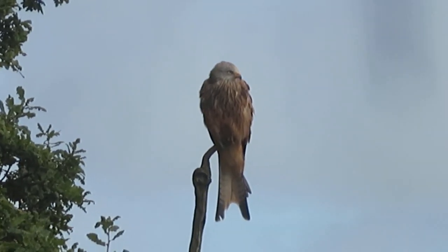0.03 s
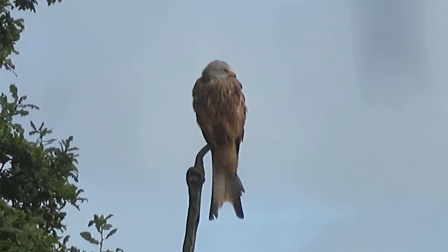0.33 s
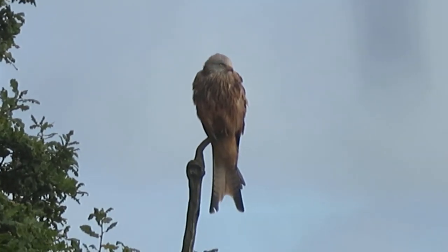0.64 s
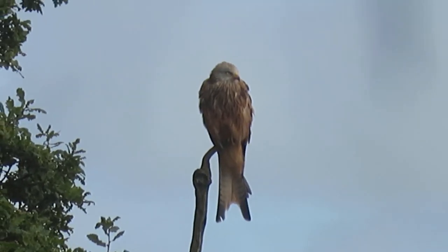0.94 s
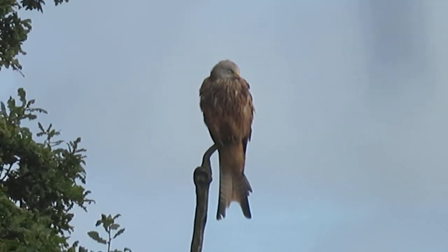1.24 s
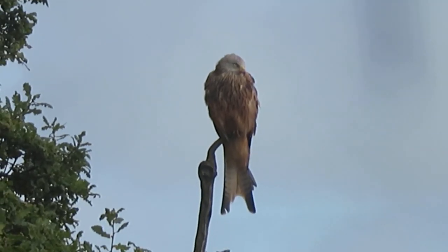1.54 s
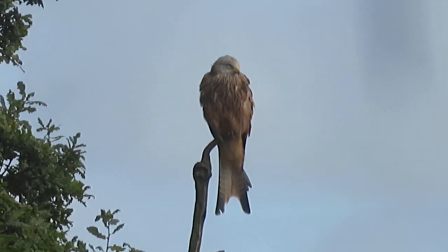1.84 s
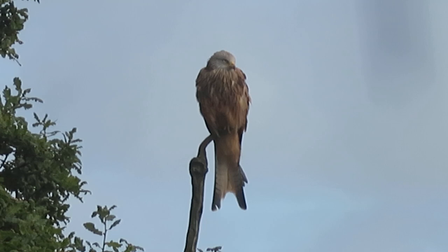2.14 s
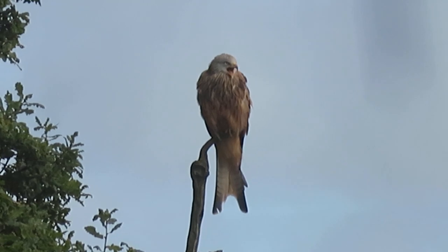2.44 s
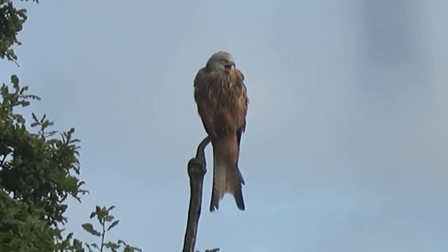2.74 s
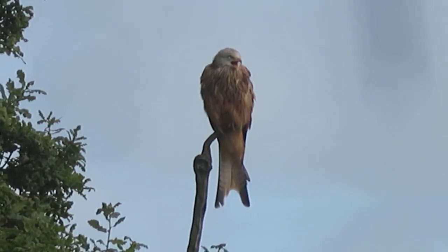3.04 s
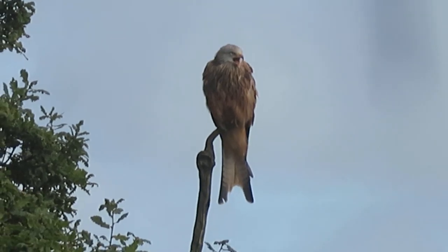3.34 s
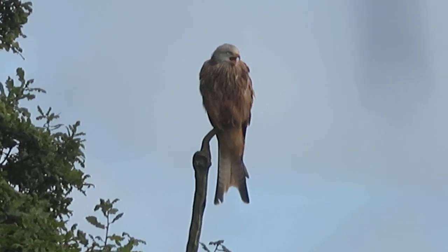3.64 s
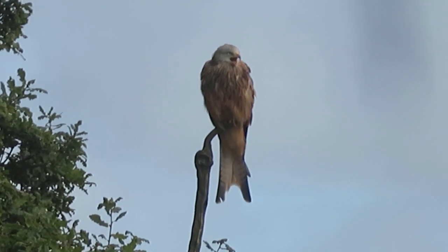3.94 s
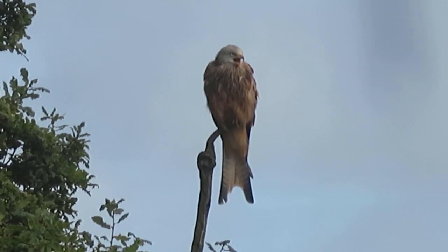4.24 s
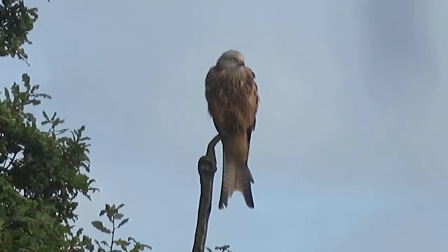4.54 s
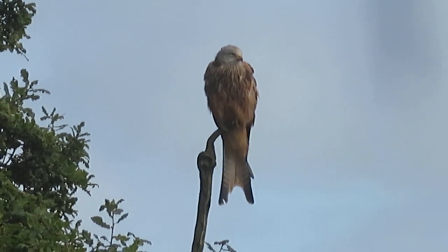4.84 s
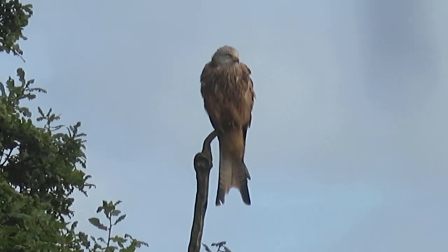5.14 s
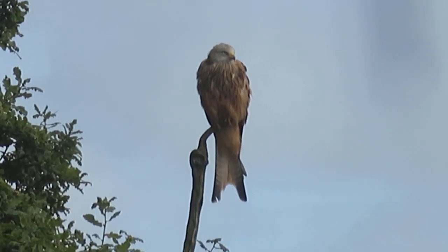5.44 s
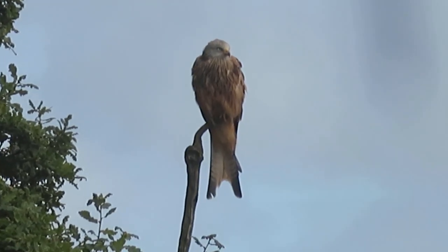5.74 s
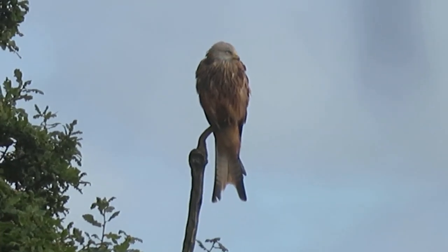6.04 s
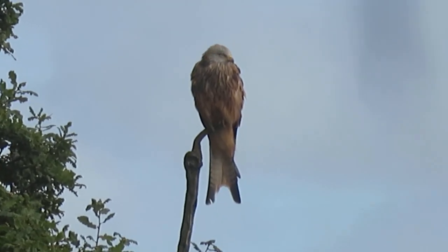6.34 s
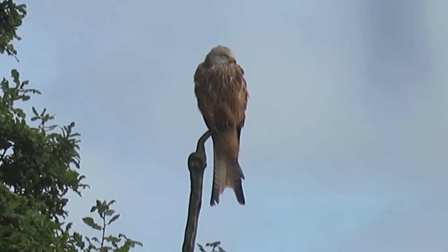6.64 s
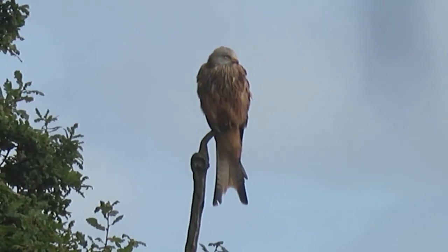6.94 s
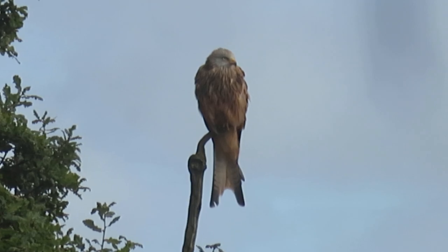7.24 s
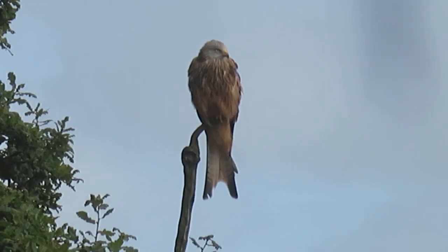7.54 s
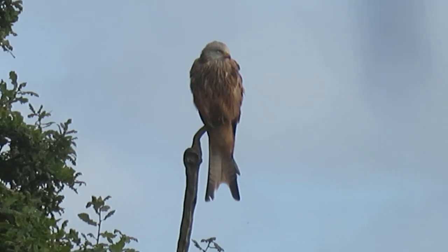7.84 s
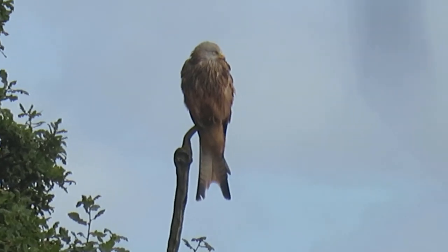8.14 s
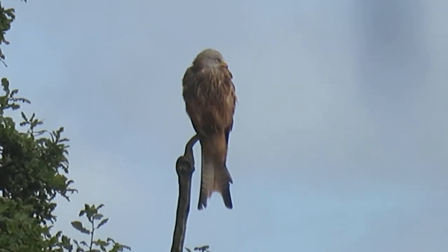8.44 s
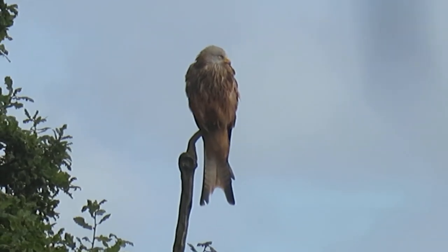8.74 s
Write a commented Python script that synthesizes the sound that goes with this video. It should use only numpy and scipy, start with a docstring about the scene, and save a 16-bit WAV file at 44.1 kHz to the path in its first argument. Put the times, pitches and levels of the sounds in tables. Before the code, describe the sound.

Low wind buffets hit the microphone over a soft outdoor hiss. In a lull, a bird of prey some way off whistles a high, drawn-out note that slides down and turns into a slightly hoarse quaver, with a light echo from the trees. A second bird replies with one very faint falling whistle. Stronger gusts follow, thumping and rumbling much louder than the birds.

```python
"""Gusts of wind thump and rumble as their eddies hit the microphone. Between them a red kite on a
bare branch gives one long falling whistle that breaks into a quaver: one side of its syrinx sings
the note, the other joins hoarsely on the crests. Another kite answers faintly from far away, and both
echo off the trees before the wind comes back harder. Behind it all lies a soft outdoor hiss, with a
few brief swishes and one small tick."""
import sys
import numpy as np
from scipy import signal
from scipy.fft import rfft, irfft, next_fast_len
from scipy.io import wavfile
from scipy.ndimage import uniform_filter1d, map_coordinates

SR = 44100
rng = np.random.default_rng(int(sys.argv[2]) if len(sys.argv) > 2 else 0)


def to_wav(sig):
    """Store sig (one row per channel, or 1-D mono) as 16-bit WAV at the path in sys.argv[1].

    Samples outside -1..1 are clipped; the rate is SR.
    """
    pcm = np.clip(np.atleast_2d(sig), -1, 1) * 32767
    pcm = np.round(pcm).astype(np.int16)
    wavfile.write(sys.argv[1], SR, pcm.T)  # frames by channels


N = 396018
TIME = np.arange(N) / SR

# The kite's long opening note. Each row: time in seconds, pitch in Hz, level in dB.
OPENING_NOTE = [(2.69, 2360, -66), (2.722, 2490, -56), (2.755, 2556, -50), (2.81, 2553, -51.5),
                (2.87, 2524, -57.5), (2.925, 2485, -64), (2.978, 2400, -52.5), (3.04, 2380, -58.5),
                (3.085, 2380, -60), (3.165, 2360, -52.5), (3.21, 2345, -53), (3.27, 2324, -61),
                (3.38, 2327, -60), (3.52, 2275, -64), (3.58, 2185, -58), (3.635, 2070, -50)]
# The flutter as that note runs out: middle and half length in seconds, beats per second, depth in dB.
CLOSING_FLUTTER = (3.422, .17, 22, 5.5)
# The quaver's pitch arches. Each row: start and rise time in seconds, crest in Hz, level rising and
# falling in dB, middle and half length of the voice break in seconds, its dip in dB, level of the
# syrinx's second side in dB, its hold past the crest in seconds.
QUAVER_ARCHES = [(3.639, 0.099, 2585, -51, -46.5, 3.732, 0.054, -15, -57.5, 0.095),
                 (3.935, 0.11, 2580, -44.5, -44.5, 4.052, 0.02, -3.5, -55.5, 0.051),
                 (4.22, 0.11, 2606, -44, -47.5, 4.325, 0.021, -5.5, -61, 0.094),
                 (4.491, .108, 2617, -48, -47.5, 4.603, 0.031, -13, -59, 0.14),
                 (4.744, 0.059, 2434, -46, -42.5, 4.855, 0.02, -8, -86, .02)]
# The voice brightens as its octave flares. Each row: middle and half length in seconds, level in dB.
OCTAVE_FLARES = [(2.83, .1, -70), (3.1, .12, -70), (3.31, 0.085, -63), (3.681, .025, -67),
                 (3.89, 0.035, -62.5), (3.97, 0.033, -64), (4.34, 0.058, -69), (4.601, 0.04, -66.5)]
# The distant answer. Each row: time in seconds, pitch in Hz, level in dB.
FAR_CALL = [(5.93, 2790, -71), (6.02, 2730, -70.5), (6.11, 2530, -68.5), (6.19, 2490, -67),
            (6.28, 2400, -68), (6.37, 2360, -68.5), (6.45, 2320, -79)]
# Gusts. Each row: peak time and length in seconds, strength of large and of small eddies in dB.
GUST_SWELLS = [(0.683, 0.032, -35, -27), (0.724, 0.05, -27.5, -32), (0.818, 0.098, -27, -26),
               (0.977, 0.08, -21.5, -27.5), (1.51, 0.095, -32.5, -59), (1.842, 0.11, -29, -39.5),
               (1.962, 0.055, -29.5, -38), (2.056, 0.061, -34, -35.5), (2.454, 0.11, -36.5, -38),
               (2.654, 0.13, -42, -48.5), (3.192, 0.086, -35.5, -42.5), (3.737, 0.094, -42, -64),
               (3.868, 0.024, -32, -53), (4.494, 0.099, -29, -36.5), (4.85, 0.15, -37, -51.5),
               (5.315, 0.051, -41, -45), (5.456, 0.16, -38.5, -45.5), (5.873, 0.099, -42, -54),
               (7.091, 0.019, -27, -33), (7.207, 0.063, -17, -26.5), (7.403, 0.026, -22, -30),
               (7.445, 0.04, -26, -22.5), (7.64, 0.017, -21, -28), (7.751, 0.084, -17, -23),
               (7.882, 0.053, -36, -23.5), (7.956, 0.021, -38, -25.5), (8.022, 0.056, -32, -25.5),
               (8.124, 0.064, -31, -25), (8.201, 0.02, -40, -23), (8.422, 0.17, -26, -22.5),
               (8.602, 0.018, -37, -25), (8.735, 0.11, -37, -28.5), (8.92, 0.041, -49, -28.5)]
# The breeze under them. Each row: time in seconds, strength of large and of small eddies in dB.
BREEZE_BED = [(0.0, -49.5, -55.5), (0.29, -50.5, -60), (0.57, -33, -46.5), (0.66, -29.5, -37),
              (0.9, -29, -40.5), (1.11, -26.5, -28), (1.3, -32, -42), (1.65, -41.5, -53.5),
              (2.05, -36.5, -47.5), (2.73, -50, -54), (3.24, -40, -54), (3.55, -45.5, -57),
              (4.49, -42, -56), (4.97, -40.5, -56), (5.13, -45, -60), (5.67, -43.5, -58.5),
              (6.26, -52.5, -59), (6.47, -43, -58), (6.87, -36.5, -56.5), (7.21, -21, -31.5),
              (7.36, -26, -32), (7.52, -31, -47), (7.6, -34, -29), (7.82, -30.5, -27), (8.07, -35.5, -33.5),
              (8.3, -38, -28), (8.6, -33.5, -29.5), (8.75, -33, -28.5), (8.81, -42, -38.5),
              (8.98, -44, -36.5)]
# The tone of the two sizes of eddy. Each row: frequency in Hz, relative level in dB.
RUMBLE_SPECTRUM = [(20, -25.5), (32, 5), (60, 9.5), (100, 12), (150, 4.5), (200, -9.5), (280, -27.5),
                   (450, -67), (2000, -110)]
KNOCK_SPECTRUM = [(80, -28), (150, 0.5), (210, 2.5), (280, -2), (360, -9), (468, -13.5), (530, -27),
                  (700, -34.5), (1200, -50.5), (4000, -100)]
# How the wind meets the microphone. Each row: time in seconds, sub-bass gain in dB, side gain in dB.
WIND_DEPTH_AND_WIDTH = [(0, 4, -32), (.6, -3.5, -3.5), (1.2, -12, -4.5), (2.3, 0.5, -6), (4.4, -3, -10),
                        (6.4, 7.5, -5.5), (7.25, -1, 5.5), (7.5, -4, -6), (7.78, -14, -5), (8.0, -14, -14),
                        (8.98, -25, -19.5)]
# The hardest buffets. Each row: time in seconds, relative peak in dB, centre in Hz, left over right in dB.
HARD_BUFFETS = [(0.402, -29.5, 147, -3), (0.598, -19, 130, -1), (0.63, -20, 116, 1), (0.665, -9.5, 215, -7),
                (0.729, -20, 177, -3), (0.783, -11, 201, 6), (0.803, -12.5, 163, 0), (0.955, -8, 140, -3),
                (0.976, -11.5, 203, -6), (1.137, -15.5, 174, -2), (1.195, -17, 175, -4),
                (1.241, -18, 152, -2), (1.787, -23, 147, -4), (1.892, -21, 148, -3),
                (1.958, -19.5, 150, -5), (2.052, -16, 166, -1), (2.132, -23, 163, -4),
                (2.306, -26.5, 200, -6), (2.443, -25, 262, -11), (2.507, -20, 141, -2),
                (2.622, -23.5, 120, -2), (3.017, -25.5, 122, -1), (3.173, -27, 118, 1),
                (3.71, -21.5, 106, -2), (3.77, -24, 126, -2), (3.856, -23.5, 122, -2.5),
                (4.062, -26, 127, -1), (4.47, -20.5, 180, -7), (4.507, -15, 195, -7),
                (4.541, -21, 130, -3.5), (4.869, -25, 147.4, -3), (4.902, -24, 123, -1.5),
                (5.322, -26, 130, 2), (5.464, -26, 140, -3), (5.837, -29, 130, 2), (5.866, -26.5, 137, 3),
                (6.011, -27.5, 108, -2), (6.605, -26.5, 92, -2), (6.694, -23, 151, -7),
                (7.094, -16.5, 111, 3), (7.195, -13, 163, 10), (7.206, -8.5, 125, -3),
                (7.229, -12, 120, -3), (7.405, -14, 183, 3), (7.449, -12.5, 236, 10), (7.612, -19, 262, 7),
                (7.633, -6.5, 175, -3), (7.687, -16, 272, -6), (7.749, -6.5, 173, -3),
                (7.769, -11, 210, -5), (7.802, -21, 310, -15), (7.871, -8.5, 186, -2),
                (8.012, -18, 214, -2), (8.033, -14, 228, 0), (8.108, -10, 207, -1.5),
                (8.132, -11.5, 245, -1.5), (8.195, -13.5, 258, -3.5), (8.259, -12, 166, -1),
                (8.29, -12, 196, -0.5), (8.339, -11, 232, -3), (8.388, -3.5, 207, -1.5),
                (8.419, -9.5, 244, -3), (8.443, -8, 220, -3), (8.551, -14.5, 206, -1),
                (8.636, -12.5, 264, -3), (8.723, -16, 243, 1), (8.85, -23.5, 206, 0),
                (8.916, -19.5, 190, -1)]
# The tone of the outdoor hiss. Each row: frequency in Hz, relative level in dB.
HISS_SPECTRUM = [(100, -1.5), (300, 15), (500, 10), (800, 8.5), (1200, 5.5), (2400, 2), (4500, -2.5),
                 (7000, -8), (11000, -13), (12500, -15.5), (14500, -20), (15600, -30)]
# The stereo image of hiss and swishes. Each row: frequency in Hz, left-right correlation.
STEREO_LIKENESS = [(60, 0.9), (200, 0.86), (600, 0.41), (1200, 0.33), (2500, 0.56), (5000, 0.53),
                   (8000, 0.28), (13000, -0.17)]
# The fader ride on the hiss. Each row: time in seconds, level in dB.
HISS_LEVEL = [(0, -51), (.7, -50.5), (1.2, -51.5), (5, -51.5), (8.98, -52)]
# Swishes. Each row: middle and half length in seconds, level in dB, centre in Hz, half width in octaves.
SOFT_SWISHES = [(0.364, 0.009, -51, 2300, .4), (0.406, 0.067, -52.5, 3200, 0.86),
                (4.195, 0.11, -56.5, 3310, 1.0), (5.935, 0.054, -59.5, 900, 0.079),
                (6.19, 0.12, -59.5, 780, 0.19)]
# One dry tick. Its row: time in seconds, peak in dB, centre in Hz, left over right in dB.
DRY_TICK = [(2.131, -39.5, 1020, 0)]

QUAVER_END_S, TROUGH_HZ = 4.85, 2094   # every arch starts and ends on the same low pitch
CUTOFF_HZ = 15600


def kite(second_ratio=1.246, second_lag_s=0.005, rasp_db=-25, crack_db=-64, flicker_db=0.95):
    """One side of the syrinx whistles; the other joins hoarsely a third higher on the quaver's crests."""
    pitch, main_db, second_db, cracked = kite_phrase()
    pitch = uniform_filter1d(uniform_filter1d(pitch, size=1200), size=1200)   # muscles round every turn
    pitch = pitch * (1 + 0.0019 * drift(70))
    falter = 1 + np.clip((-48.5 - main_db) / 4, 0, 1.2)   # a weakly blown note nearly breaks off
    main_gain = from_db(main_db + flicker_db * falter * drift(80))
    main = main_gain * whistle(pitch, jitter=0.0018, jitter_rate=450)
    flare = sum(from_db(db) * np.exp(-((TIME - s) / half) ** 2) for s, half, db in OCTAVE_FLARES)
    octave = flare * from_db(2 * drift(60)) * whistle(2 * pitch, jitter=0.00304, jitter_rate=430)
    patches = from_db(3.8 * np.minimum(drift(110), 1.3) - 2)
    hoarse = patches * whistle(second_ratio * pitch, jitter=0.015, jitter_rate=900)
    second = from_db(np.interp(TIME - second_lag_s, TIME, second_db)) * hoarse
    # rushing air spreads a faint skirt of noise round the note, stronger where the voice cracks
    rasp_gain = from_db(main_db + rasp_db) + from_db(crack_db) * cracked
    rasp = rasp_gain * drift(800) * whistle(pitch, jitter=0.0297, jitter_rate=2200)
    return (main + octave + second + rasp) * gate(OPENING_NOTE[0][0], QUAVER_END_S, fade_s=0.0052)


def kite_phrase(rise_curve=1.5, fall_curve=1.62, sag_db=-3.5, trough_db=-22, fade_db_per_s=400):
    """Pitch, levels of the syrinx's two sides and its cracking: one long note, then a run of arches."""
    pitch, main_db = automation(OPENING_NOTE)
    middle, half, beat_hz, depth_db = CLOSING_FLUTTER
    flutter_db = depth_db * np.exp(-((TIME - middle) / half) ** 2)
    main_db += flutter_db * np.cos(2 * np.pi * beat_hz * (TIME - middle))
    second_db, cracked = np.full(N, -120.), np.zeros(N)
    ends = [arch[0] for arch in QUAVER_ARCHES[1:]] + [QUAVER_END_S]
    for arch, end in zip(QUAVER_ARCHES, ends):
        start, rise, crest_hz, rise_db, fall_db, break_at, break_half, break_db, side_db, hold = arch
        now = (TIME >= start) & (TIME < end + .1)
        past_crest = TIME[now] - start - rise
        rising = past_crest < 0
        # the pitch lingers in the trough, climbs, then falls ever more steeply
        climb = np.abs(np.cos(np.pi / 2 * past_crest / rise)) ** rise_curve
        fallen = np.clip(past_crest / (end - start - rise), 0, 1)
        height = np.where(rising, climb, 1 - fallen ** fall_curve)
        pitch[now] = TROUGH_HZ + (crest_hz - TROUGH_HZ) * height
        voice_break = np.exp(-((TIME[now] - break_at) / break_half) ** 6)
        dip_db = break_db * voice_break + sag_db * np.sin(np.pi * fallen ** 2)
        main_db[now] = np.where(rising, rise_db, fall_db) + dip_db
        grating = 1.3 * rising * np.sin(np.pi * height) ** 2   # the voice grates halfway up each climb
        cracked[now] = np.maximum(voice_break, grating)
        release_db = fade_db_per_s * np.maximum(past_crest - hold, 0)
        second_db[now] = side_db + trough_db * (1 - height) ** 2 - release_db
    return pitch, *uniform_filter1d([main_db, second_db, cracked], size=400)


def far_kite(flicker_db=2.0):
    """A faint falling whistle, made unsteady by the air on its long way."""
    pitch, level_db = automation(FAR_CALL)
    tone = whistle(pitch, jitter=0.008, jitter_rate=280)
    gain = from_db(level_db + flicker_db * drift(35))
    return gain * tone * gate(FAR_CALL[0][0], FAR_CALL[-1][0], fade_s=0.055)


def whistle(pitch_hz, jitter, jitter_rate):
    """A near sine of rms 1 whose pitch trembles."""
    trembling_hz = pitch_hz * (1 + jitter * drift(jitter_rate))
    return np.sqrt(2) * np.sin(2 * np.pi * np.cumsum(trembling_hz) / SR)


def tree_echoes(x, t60, count=40):
    """Sparse echoes scattered back from the foliage, different on each side."""
    out = np.zeros((2, N))
    for channel in out:
        for delay_s, size in zip(rng.uniform(0.032, 0.29, count), rng.standard_normal(count)):
            lag = int(delay_s * SR)
            channel[lag:] += size * from_db(-60 * delay_s / t60) * x[:N - lag]
    return out / np.sqrt(count)


def wind(knock_trim_db=0.1, edge_db=-8, ports_hz=205):
    """Large eddies rumble on the microphone; small ones knock, more sharply the harder it blows."""
    large_db, small_db = wind_strength()
    depth_db, width_db = automation(WIND_DEPTH_AND_WIDTH)
    kicks = eddies(per_s=700, spread_db=3.5)
    rumble = from_db(large_db) * buffet(kicks, RUMBLE_SPECTRUM)
    sub_bass = signal.sosfiltfilt(signal.butter(2, 75, fs=SR, output="sos"), rumble)
    rumble += sub_bass * (from_db(depth_db) - 1)
    knocks = from_db(small_db + knock_trim_db) * buffet(kicks, KNOCK_SPECTRUM)
    dull = signal.sosfiltfilt(signal.butter(3, 330, fs=SR, output="sos"), knocks)
    # slow air sheds fewer of the finest eddies
    lull = np.clip((-29.5 - uniform_filter1d(small_db, size=20000)) / 20, 0, .7)
    knocks = dull + (knocks - dull) * from_db(edge_db * lull)
    mid, side = rumble + knocks
    # long pressure waves press on both ports alike, so the side loses its bass
    low_cut = signal.butter(2, ports_hz, "high", fs=SR, output="sos")
    side = from_db(width_db) * signal.sosfilt(low_cut, side)
    return (mid + side * [[1], [-1]]) * from_db([[-.3], [.3]])


def wind_strength(turbulence_db=1.7, steepness=3.9):
    """Levels in dB of the large and the small eddies: steep-sided gusts on top of an uneven breeze."""
    power = from_db(np.array(automation(BREEZE_BED)) + turbulence_db * drift(20)) ** 2
    for s, length, large_db, small_db in GUST_SWELLS:
        near = np.abs(TIME - s) < 2 * length
        swell = np.exp(-np.abs(2 * (TIME[near] - s) / length) ** steepness)
        power[:, near] += from_db([[large_db], [small_db]]) ** 2 * swell
    return 10 * np.log10(power)


def eddies(per_s, spread_db):
    """Pressure kicks at random moments, a few much stronger than the rest."""
    sizes = from_db(spread_db * np.minimum(rng.exponential(1, N), 5)) * rng.choice([-1, 1], N)
    return sizes * (rng.random(N) < per_s / SR)


def buffet(kicks, spectrum):
    """Kicks rounded into thumps of steady mean power, as mid and side of the two microphone ports."""
    mid_side = np.array([kicks, kicks * rng.standard_normal(N)])
    size = next_fast_len(N + 4096)
    hz = np.fft.rfftfreq(size, 1 / SR)
    lumps = rms_one(irfft(rfft(mid_side, size) * eq_gain(spectrum, hz), size)[:, :N])
    power = uniform_filter1d(uniform_filter1d(lumps ** 2, size=1500), size=1500)
    return lumps / np.sqrt(power + 1e-4)


def thumps(ring_hz=404, ring_db=-13, db_per_octave=10):
    """Single eddies burst on the ports and briefly ring the microphone's hollow, blunt ones less."""
    rings = [(s, peak_db + ring_db + db_per_octave * np.log2(hz / ring_hz), ring_hz, pan_db)
             for s, peak_db, hz, pan_db in HARD_BUFFETS]
    return pulses(HARD_BUFFETS, cycles=0.44) + pulses(rings, cycles=1.14)


def pulses(rows, cycles):
    """Short pressure pulses, a push with a rebound; more cycles let each swing longer."""
    out = np.zeros((2, N))
    for s, peak_db, hz, pan_db in rows:
        near = np.abs(TIME - s) < .05
        turns = (TIME[near] - s) * hz
        pulse = np.cos(2 * np.pi * turns + rng.uniform(-1.16, 1)) * np.exp(-.5 * (turns / cycles) ** 2)
        out[:, near] += from_db(peak_db + pan_db * np.array([[.5], [-.5]])) * pulse
    return out


def swishes():
    """Puffs of noise that swell and fade softly, each round its own pitch."""
    out, grid_hz = 0, np.geomspace(100, CUTOFF_HZ, 60)
    for s, half, level_db, hz, octaves in SOFT_SWISHES:
        hump_db = -20 * np.log10(1 + (np.log2(grid_hz / hz) / octaves) ** 2)
        swell = from_db(level_db) * np.exp(-.5 * ((TIME - s) / half) ** 2)
        out = out + swell * stereo_noise(np.column_stack([grid_hz, hump_db]))
    return out * from_db(.5 * drift(47))


def outdoor_hiss():
    """A soft, even bed of open air."""
    level_db, = automation(HISS_LEVEL)
    return from_db(level_db + 0.15 * drift(2)) * stereo_noise(HISS_SPECTRUM)


def stereo_noise(spectrum):
    """Diffuse noise of rms 1, narrow in the bass and wider towards the treble."""
    size = next_fast_len(N, real=True)
    hz = np.fft.rfftfreq(size, 1 / SR)
    alike = at_hz(STEREO_LIKENESS, hz)
    mid, side = rfft(rng.standard_normal((2, size)))
    left_right = np.sqrt(1 + alike) * mid + np.sqrt(1 - alike) * side * [[1], [-1]]
    return rms_one(irfft(eq_gain(spectrum, hz) * left_right, size)[:, :N])


def eq_gain(spectrum, hz):
    """The gain of a tone curve, rolled off below 20 Hz."""
    return from_db(at_hz(spectrum, hz)) * hz ** 2 / (hz ** 2 + 20 ** 2)


def at_hz(points, hz):
    """Read a curve on a log-frequency axis."""
    known_hz, values = np.transpose(points)
    return np.interp(np.log(hz + 1e-9), np.log(known_hz), values)


def automation(rows):
    """Timed breakpoints drawn out sample by sample, one lane per value column."""
    s, *columns = np.transpose(rows)
    return [np.interp(TIME, s, column) for column in columns]


def drift(rate):
    """Smooth random modulation of rms 1 that changes about rate times a second."""
    knots = rng.standard_normal(N // 20)
    return rms_one(map_coordinates(knots, [TIME[::10] * rate], order=3, mode="wrap")).repeat(10)[:N]


def gate(start, end, fade_s):
    """Open between start and end, with short fades outside."""
    return np.clip(np.minimum(TIME - start, end - TIME) / fade_s + 1, 0, 1)


def from_db(db):
    """Decibels to gain."""
    return 10 ** (np.asarray(db) / 20)


def rms_one(x):
    """Scale to unit rms."""
    return x / np.sqrt(np.mean(x ** 2) + 1e-20)


def scene():
    """The birds dead centre among trees, the wind right on the microphone, the hiss behind."""
    birds = kite() + far_kite()
    echoes = from_db(-3.5) * tree_echoes(birds, t60=0.57)
    gusts = wind() + from_db(-1.5) * thumps()
    background = outdoor_hiss() + swishes() + pulses(DRY_TICK, cycles=.8)
    return birds + echoes + gusts + background


def record(dry):
    """A steep high cut takes off the very top."""
    return signal.sosfilt(signal.ellip(10, .1, 90, CUTOFF_HZ, fs=SR, output="sos"), dry)


dry = scene()
out = record(dry)
to_wav(out)
```